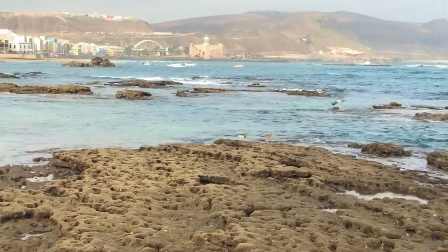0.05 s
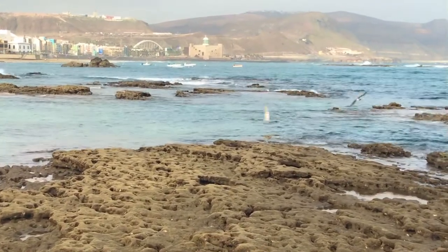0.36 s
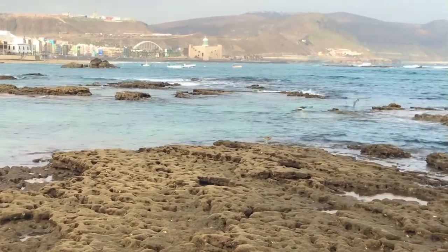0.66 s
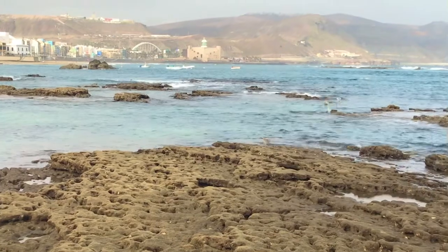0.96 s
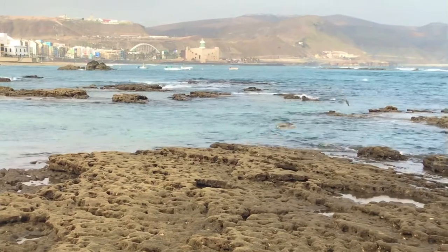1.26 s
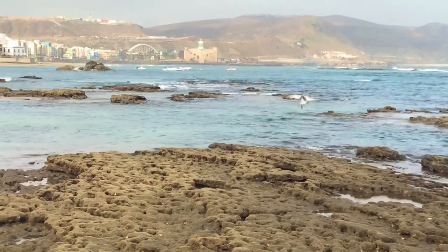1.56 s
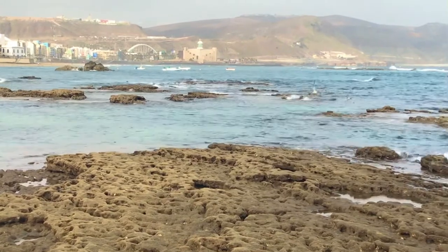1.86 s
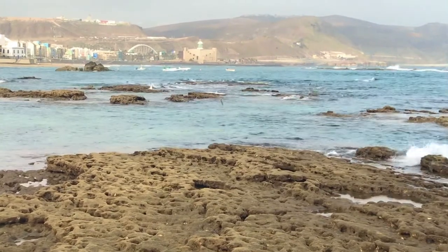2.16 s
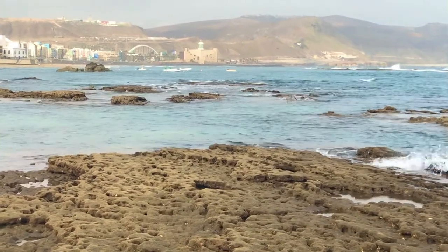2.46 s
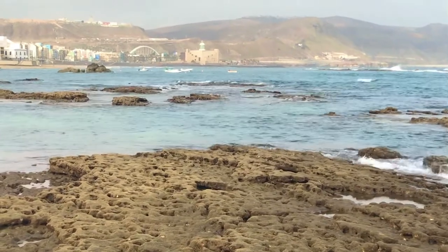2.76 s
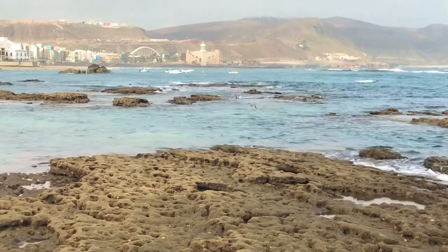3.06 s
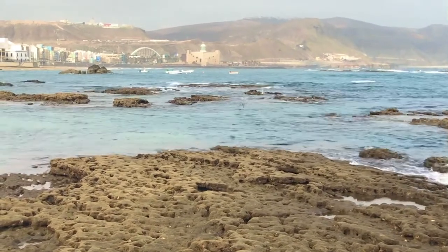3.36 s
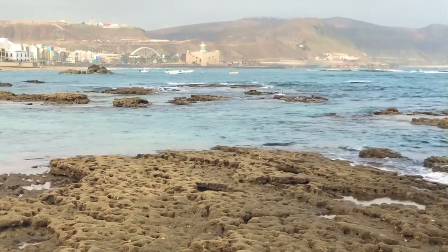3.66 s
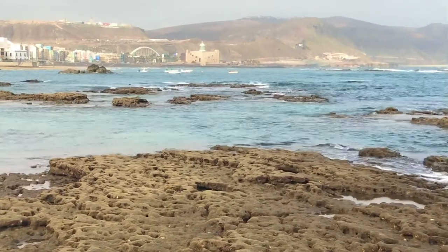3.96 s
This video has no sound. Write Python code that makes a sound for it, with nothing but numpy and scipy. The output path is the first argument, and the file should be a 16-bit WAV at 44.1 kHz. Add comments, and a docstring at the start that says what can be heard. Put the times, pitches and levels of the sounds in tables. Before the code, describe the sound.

Wind rumbles and thumps on the microphone in short gusts at a rocky shore. Behind it, distant surf roars steadily and small waves fizz over nearby rocks. Towards the end, two faraway shorebirds give faint, short pips.

```python
"""A windy rocky shore, heard from one microphone near the water.
From the start, surf roars steadily on the outer reefs while small waves wash and fizz over the near rocks.
All along, wind rumbles on the microphone and strong eddies hit it in short buffets.
Towards the end, two distant shorebirds give short, slightly falling pips."""
import sys
import numpy as np
from scipy import signal
from scipy.fft import rfft, irfft
from scipy.io import wavfile
from scipy.ndimage import uniform_filter1d

SR = 44100
rng = np.random.default_rng(int(sys.argv[2]) if len(sys.argv) > 2 else 0)


def wav_record(signal):
    """Record a signal, one row per channel, as 16-bit PCM in the file named by sys.argv[1]."""
    frames = np.transpose(np.atleast_2d(signal))
    bounded = np.clip(frames, -1, 1)
    # unit amplitude maps onto the largest positive 16-bit level
    quanta = np.round(bounded * 32767).astype(np.int16)
    wavfile.write(sys.argv[1], SR, quanta)


N = 176400
TIME = np.arange(N) / SR


def from_db(db):
    """Decibels to gain."""
    return 10 ** (np.asarray(db) / 20)


def unit_rms(x):
    """Scale to an rms of 1."""
    return x / np.sqrt(np.mean(x ** 2) + 1e-20)


def in_time(rows):
    """Each column of a curve, at every sample."""
    time_s, *columns = np.transpose(rows)
    return [np.interp(TIME, time_s, column) for column in columns]


def drift(rate_hz):
    """A smooth random wander with a spread of 1."""
    step, settle = 40, 2000
    pole = np.exp(-2 * np.pi * rate_hz * step / SR)
    white = rng.standard_normal(N // step + settle + 2)
    slow = signal.lfilter([1], [1, -2 * pole, pole * pole], white)[settle:]
    return np.interp(np.arange(N) / step, np.arange(len(slow)), unit_rms(slow))


def noise(spectrum):
    """Noise of the given colour, rms 1."""
    hz, db = np.transpose(spectrum)
    bins_hz = np.maximum(np.fft.rfftfreq(N, 1 / SR), 1)
    gain = from_db(np.interp(np.log(bins_hz), np.log(hz), db))
    return unit_rms(irfft(rfft(rng.standard_normal(N)) * gain, N))


def turbulence(spectrum, even_s):
    """Random pressure swings whose strength is kept even over the given time."""
    swings = noise(spectrum)
    power = np.abs(signal.hilbert(swings)) ** 2
    window = max(int(even_s * SR), 1)
    local_power = uniform_filter1d(uniform_filter1d(power, window), window)
    return unit_rms(swings / np.sqrt(local_power + 1e-3))


def churn(x, patchy_db, rate_hz):
    """Let every half octave swell and sink by itself."""
    half_octaves = 2 * np.log2(np.clip(np.fft.rfftfreq(N, 1 / SR), 250, 16000) / 250)
    spectrum, out = rfft(x), 0
    for k in range(13):
        band = irfft(spectrum * np.maximum(1 - np.abs(half_octaves - k), 0), N)
        out += band * from_db(patchy_db * drift(rate_hz))
    return unit_rms(out)


def microphone_hiss():
    """The microphone's own faint, nearly white noise."""
    return from_db(-75) * noise([(2000, 0.012), (15500, 0.0029)])


def spray(drops_per_s=900, ring_cycles=3.9):
    """Drops and bursting foam on the near rocks: tiny clicks that ring for a few cycles."""
    sizes = from_db(3 * np.minimum(rng.exponential(1, N), 4)) * rng.choice([-1, 1], N)
    clicks = sizes * (rng.random(N) < drops_per_s / SR)
    pitch_index, out = rng.integers(0, 16, N), 0
    for k, pitch_hz in enumerate(np.geomspace(1400, 6500, 16)):
        pole = from_db(-60 * pitch_hz / (ring_cycles * SR))
        angle = 2 * np.pi * pitch_hz / SR
        drops = clicks * (pitch_index == k) + 1e-18
        out += signal.lfilter([0, np.sin(angle)], [1, -2 * pole * np.cos(angle), pole * pole], drops)
    return unit_rms(signal.sosfilt(signal.butter(4, 9000, fs=SR, output="sos"), out))


# Colour of the far breakers and of the near wash: frequency_hz, relative_db
ROAR_SPECTRUM = [(100, -27), (300, 4), (500, -0.5), (750, 2), (1000, -0.5), (1300, 1), (1650, 4.5),
                 (2000, 3), (2400, -2.5), (2800, -7.5), (3300, -14.5), (4500, -49), (8000, -49)]
WASH_SPECTRUM = [(1500, -32), (2600, 4.5), (3400, -1), (4200, 2.5), (5400, 4), (5900, 3.5), (6150, -3),
                 (7200, -8), (8600, -11), (9500, -15.5), (10300, -23), (12000, -28.5), (15500, -28)]
# Rise and fall of the sea, before the trims: time_s, roar_db, wash_db
SURF_LEVELS = [(0, -38.5, -46), (.15, -43, -49.5), (.35, -42.5, -50.5), (.7, -41, -49.5),
               (1.05, -40.5, -48), (1.35, -37.5, -46), (1.55, -39.5, -47.5), (1.9, -39, -44.5),
               (2.2, -39.5, -47.5), (2.48, -39, -45), (2.7, -39.5, -47), (2.95, -40, -47.5),
               (3.25, -40.5, -47.5), (3.6, -39.5, -47), (4, -40, -45.5)]


def surf(roar_trim_db=-1.5, wash_trim_db=-3):
    """Breakers roar far out on the reefs; close by, the water hisses and throws spray."""
    roar_db, wash_db = in_time(SURF_LEVELS)
    roar = churn(noise(ROAR_SPECTRUM), patchy_db=1.1, rate_hz=8.1)
    wash = churn(noise(WASH_SPECTRUM), patchy_db=1.0, rate_hz=35) + from_db(-4.5) * spray()
    return from_db(roar_db + roar_trim_db) * roar + from_db(wash_db + wash_trim_db) * wash


# Calls of two birds far along the shore: start_s, length_s, pitch_hz, level_db, octave_relative_db
BIRD_PIPS = [(2.816, 0.019, 2130, -37, -14), (3.003, 0.021, 2596, -39.5, -13),
             (3.093, 0.025, 2635, -39.5, -11), (3.286, 0.032, 2643, -39.5, -15),
             (3.39, 0.03, 2650, -38, -13), (3.491, 0.044, 2590, -41, -12.5),
             (3.619, .038, 2100, -42, -14.5), (3.733, .036, 2580, -42.5, -7),
             (3.841, 0.018, 2080, -39.5, -16), (3.953, 0.024, 2600, -46, -10)]


def shorebirds(edge_s=0.0078, echo_db=-10, echo_t60_s=0.26):
    """Distant arching, falling whistles with a weaker octave, scattered by rocks and water."""
    arch, fall, waver = .04, .028, .01 * drift(159)  # shares of the pitch
    pips = 0
    for start_s, length_s, pitch_hz, level_db, octave_db in BIRD_PIPS:
        from_middle = np.clip((TIME - start_s) / length_s, 0, 1) - .5
        bend = 1 - fall * from_middle - 2 * arch * from_middle ** 2 + waver
        phase = 2 * np.pi * np.cumsum(pitch_hz * bend) / SR
        envelope = np.clip(np.minimum(TIME - start_s, start_s + length_s - TIME) / edge_s, 0, 1)
        whistle = np.sin(phase) + from_db(octave_db) * np.sin(2 * phase)
        pips += from_db(level_db) * np.sqrt(2) * envelope * whistle
    scatter = rng.standard_normal(SR // 2) * from_db(-60 * TIME[:SR // 2] / echo_t60_s)
    echo = signal.fftconvolve(pips, scatter / np.linalg.norm(scatter))[:N]
    return pips + from_db(echo_db) * echo


# Colours of the wind right on the microphone, low to high: frequency_hz, relative_db
RUMBLE_SPECTRUM = [(18, -56), (30, -28), (41, -11), (52, -2.5), (75, -0.5), (105, -2.5), (150, -12),
                   (220, -21.5), (400, -48), (800, -69)]
THUMP_SPECTRUM = [(25, -47), (42, -10), (60, 6.5), (90, 6), (125, 4), (170, -9), (260, -35.5), (500, -68.5)]
FLUTTER_SPECTRUM = [(90, -18.5), (150, 2), (200, 4), (290, -3.5), (370, -11.5), (500, -32), (900, -70.5)]
RASP_SPECTRUM = [(220, -33), (380, 2), (510, 0), (640, -7), (800, -18), (1200, -20), (3000, -70)]
# Strength of the wind between buffets: time_s, relative_db
WIND_STRENGTH = [(0, -30.5), (.2, -25), (.45, -25.5), (.58, -32), (.72, -23.5), (.92, -29), (1.2, -34.5),
                 (1.4, -26), (1.62, -29), (1.92, -26), (2.05, -29.5), (2.5, -27.5), (2.75, -25),
                 (2.88, -29.5), (3.02, -26.5), (3.24, -26.5), (3.32, -33.5), (3.42, -25.5), (3.75, -28.5),
                 (4, -25.5)]
# Strong eddies on the microphone, before the trims: centre_s, half_width_s, thump_db, flutter_db, rasp_db
WIND_BUFFETS = [(0.092, 0.02, -12.5, -19.5, -42), (0.139, 0.02, -13.5, -15.5, -27),
                (0.253, 0.053, -20, -33, -46), (0.279, 0.0098, -20, -19, -29.5),
                (0.33, 0.06, -22, -27, -45), (.392, 0.0181, -21, -18.5, -28),
                (.422, 0.011, -40, -20.5, -33), (0.503, 0.02, -18, -16.5, -32),
                (0.529, .018, -14, -21.5, -30), (0.622, 0.016, -31, -18.5, -46),
                (0.67, 0.015, -23.5, -27, -35), (0.754, .035, -20, -26.5, -34.5),
                (0.864, 0.012, -18, -16, -30.5), (0.975, 0.042, -23, -25, -41),
                (1.055, 0.017, -16.5, -23, -38), (1.145, 0.017, -20.5, -23.5, -43),
                (1.343, 0.012, -23.5, -16.5, -34), (1.371, 0.024, -19.5, -29, -42.5),
                (1.693, 0.011, -16.5, -20.5, -34), (1.769, 0.016, -18.5, -17.5, -38.5),
                (2.276, 0.014, -13, -18.5, -45), (2.42, 0.017, -18.5, -21, -37.5),
                (2.556, 0.02, -13, -17.5, -27.5), (2.689, 0.013, -34, -19, -50),
                (2.826, 0.018, -26, -20, -34), (2.939, 0.012, -20, -12.5, -28),
                (2.976, 0.0075, -15, -33, -52), (3.025, 0.035, -18.5, -26, -52),
                (3.09, 0.011, -23, -20.5, -51), (3.144, 0.019, -14.5, -31, -52),
                (3.473, 0.011, -26, -18.5, -32), (3.492, 0.013, -9, -11, -24),
                (3.548, 0.017, -20, -19, -31.5), (3.593, 0.015, -33, -14, -29),
                (3.664, 0.012, -7, -25.5, -32.5), (3.822, 0.018, -19, -20, -33.5),
                (3.866, 0.019, -10, -15.5, -25.5)]


def wind(top_hz=2500):
    """Air on the microphone: a lumpy rumble, small eddies, and buffets of thump, flutter and rasp."""
    strength_db, = in_time(WIND_STRENGTH)
    lumps = drift(20.6)
    rumble = from_db(strength_db + 3 * lumps + 0.7) * turbulence(RUMBLE_SPECTRUM, even_s=0.039)
    eddy_db = strength_db - 13 + 3 * (0.97 * lumps + 0.87 * drift(18))
    eddies = noise(FLUTTER_SPECTRUM) + from_db(-13) * noise(RASP_SPECTRUM)
    out = rumble + from_db(eddy_db) * eddies
    # A buffet's higher parts are shorter than its thump: sound, trim_db, width_share
    parts = [(turbulence(THUMP_SPECTRUM, even_s=0.03), -2.5, 1),
             (turbulence(FLUTTER_SPECTRUM, even_s=0.0094), -4, 0.85),
             (turbulence(RASP_SPECTRUM, even_s=0.0081), -3.5, 0.87)]
    for centre_s, half_width_s, *levels_db in WIND_BUFFETS:
        for (sound, trim_db, width_share), level_db in zip(parts, levels_db):
            from_centre = (TIME - centre_s) / (half_width_s * width_share)
            swell = np.exp(-2 * np.minimum(from_centre ** 2, 20))
            out += from_db(level_db + trim_db) * swell * sound
    return signal.sosfilt(signal.butter(4, top_hz, fs=SR, output="sos"), out)


def scene():
    """Wind, sea and birds at one microphone on the shore."""
    return (wind() + surf() + shorebirds() + microphone_hiss())[None]


def record(dry):
    """The deepest bass and the top are cut."""
    low_cut = signal.butter(5, 33, "high", fs=SR, output="sos")
    high_cut = signal.ellip(10, .1, 80, 15700, fs=SR, output="sos")
    return signal.sosfilt(high_cut, signal.sosfilt(low_cut, dry))


dry = scene()
out = record(dry)
wav_record(out)
```